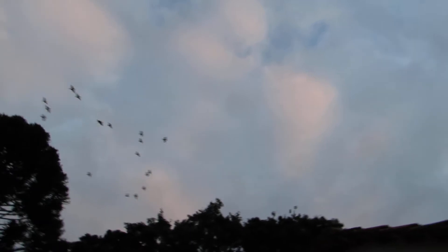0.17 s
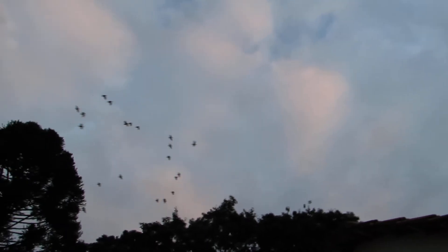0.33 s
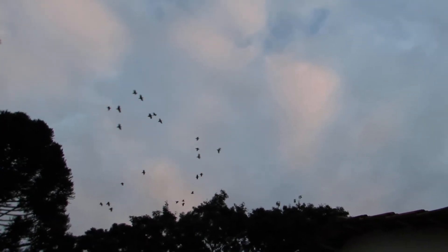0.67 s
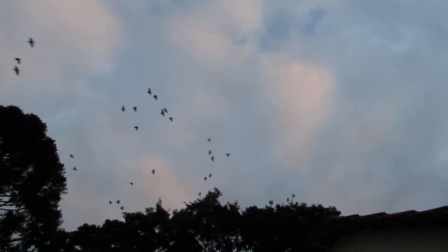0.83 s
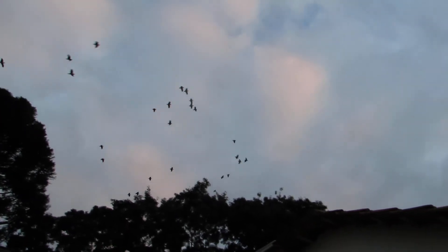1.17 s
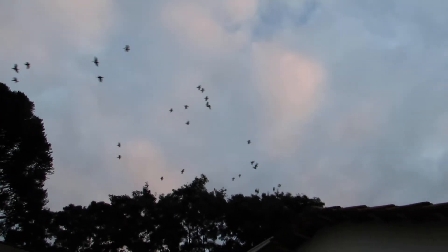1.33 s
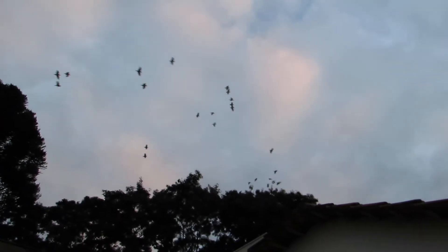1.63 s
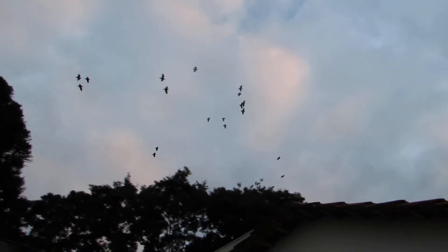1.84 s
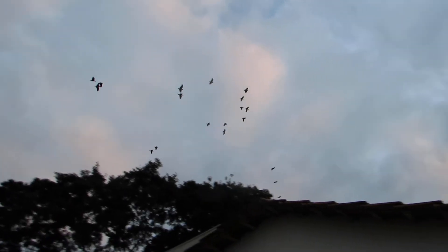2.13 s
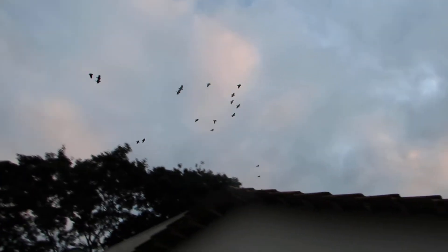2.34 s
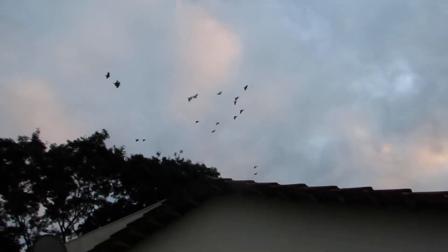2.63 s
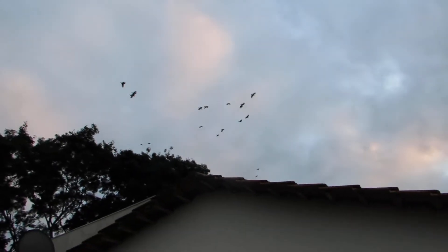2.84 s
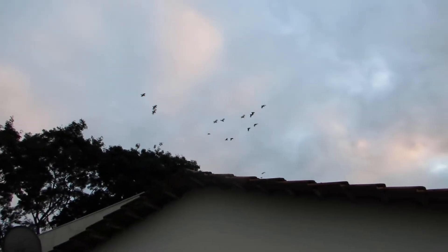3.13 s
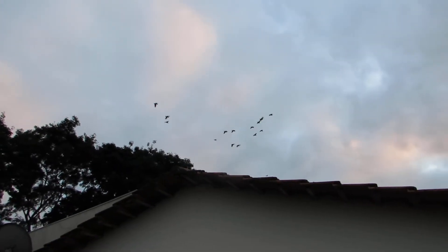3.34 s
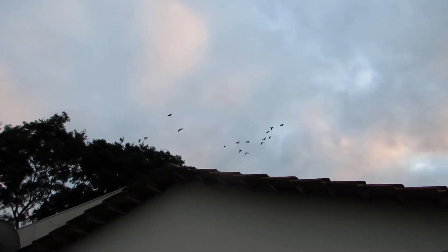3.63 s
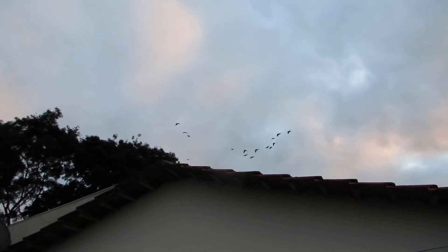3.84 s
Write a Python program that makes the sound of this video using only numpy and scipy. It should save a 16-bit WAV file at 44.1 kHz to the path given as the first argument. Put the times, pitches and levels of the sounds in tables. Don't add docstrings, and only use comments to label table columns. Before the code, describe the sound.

A flock of parrots squawks, yelps and whistles in overlapping chatter while passing overhead, heard left of centre outdoors on a handheld camera microphone, with grip thumps, a click and soft breeze rumble.

```python
import sys
import numpy as np
from scipy import signal
from scipy.fft import rfft, irfft
from scipy.io import wavfile
from scipy.ndimage import uniform_filter1d

SR = 44100
rng = np.random.default_rng(int(sys.argv[2]) if len(sys.argv) > 2 else 0)


def generate_wav(signal):
    frames = np.transpose(np.atleast_2d(signal))
    scaled = np.clip(frames, -1, 1) * 32767
    pcm = np.round(scaled).astype(np.int16)
    wavfile.write(sys.argv[1], SR, pcm)


def invert_db(x):
    u = np.asarray(x, float) / 20
    return 10 ** u


N = 175959

# start_s, length_s, level_db, pitch_hz
SQUAWKS = [(0.201, 0.3, -36.5, 743), (0.538, 0.18, -36.5, 1083), (0.701, 0.19, -39, 896),
           (0.902, 0.25, -40, 898.4), (1.079, 0.18, -38.5, 1051), (1.28, 0.26, -35.5, 811.7),
           (1.611, 0.15, -38.5, 996), (1.872, 0.22, -35.5, 889), (2.241, 0.28, -39.5, 1083),
           (2.46, .24, -35, 761), (2.683, 0.21, -38.5, 794.6), (2.817, 0.17, -40.5, 1037),
           (3.172, 0.27, -43.5, 906), (3.376, .11, -43, 1020), (3.586, 0.43, -46.5, 949),
           (3.819, .13, -42, 1414)]
# start_s, length_s, level_db, pitch_hz
RASPS = [
    (.25, .2, -46, 758),
    (1.9, .14, -46, 900),
    (3.828, 0.027, -39.5, 1180),
    (3.851, 0.092, -41.5, 1253),
]
# start_s, length_s, level_db, first_pitch_hz, last_pitch_hz
YELPS = [(0.125, 0.054, -44, 1194, 1096), (0.334, 0.081, -31, 1281, 1130), (0.538, .035, -28.5, 1284, 1184),
         (0.579, 0.059, -33.5, 1159, 1125), (0.7, 0.087, -34.5, 1136, 1092),
         (1.351, 0.066, -33, 1214, 1199), (0.738, 0.059, -40, 1117, 966), (0.854, 0.021, -33.5, 1258, 982),
         (1.90, 0.12, -30, 1099, 1089), (2.265, 0.093, -45, 1110, 1150), (2.381, 0.098, -35, 1076, 1096),
         (2.544, 0.041, -32.5, 990, 950), (2.837, 0.1164, -38, 1058, 1023), (3.01, 0.07, -38.5, 1123, 1092),
         (3.16, 0.06, -28.5, 1366, 1246), (3.22, 0.062, -40.5, 1294, 1218), (3.435, 0.04, -40.5, 1079, 945),
         (3.588, 0.045, -43.5, 1084, 1040)]
# start_s, length_s, level_db, first_pitch_hz, last_pitch_hz (before the swing)
ARCHED_YELPS = [
    (1.25, .08, -33.5, 1300, 1330),
    (3.838, .08, -32, 1330, 1290),
]
# start_s, length_s, level_db, first_pitch_hz, last_pitch_hz
FALLING_SQUAWK = (3.415, .065, -34.5, 1150, 950)
# start_s, length_s, level_db, first_pitch_hz, last_pitch_hz
WHISTLES = [(.096, 0.024, -41.5, 2005, 1800), (0.098, 0.037, -39.5, 1095, 1032),
            (0.481, 0.026, -41, 2400, 2700), (0.521, 0.028, -35, 2750, 2524), (.96, 0.058, -35, 2210, 2170),
            (.973, 0.017, -37, 2620, 2870), (1.025, 0.026, -38, 2950, 2530),
            (1.022, 0.024, -35.5, 1966, 1850), (1.074, 0.012, -32.5, 2273, 2200),
            (1.13, 0.039, -36, 2185, 2176), (1.16, 0.028, -43, 2840, 2870), (1.186, .026, -32, 2845, 1524),
            (1.203, 0.036, -36.5, 2212, 1510), (1.15, 0.023, -38, 1477, 1595),
            (1.618, 0.038, -38, 1994, 2120), (1.67, 0.034, -35, 1690, 2193),
            (1.694, 0.035, -33.5, 2160, 1953), (1.359, 0.072, -37.5, 2027, 2105),
            (1.445, 0.0302, -37, 2620, 2150), (1.55, 0.033, -39, 1700, 1620),
            (1.728, 0.045, -40, 1455, 1400), (2.264, 0.018, -35.5, 2495, 2610),
            (2.291, 0.027, -38, 2300, 2240), (2.295, 0.031, -38.5, 1672, 1724),
            (2.36, 0.022, -34.5, 1430, 1360), (2.415, .025, -34.5, 2306, 2500),
            (2.497, 0.056, -40, 2283, 2376), (2.60, 0.029, -36, 1980, 2110),
            (2.639, 0.023, -34, 1610, 1596), (2.695, 0.086, -37, 1598, 1616),
            (3.766, 0.023, -39, 2004, 1890), (3.768, 0.053, -47.5, 4200, 4620)]
# start_s, length_s, level_db, first_pitch_hz, last_pitch_hz
HONKS = [(0.578, 0.16, -38.5, 1344, 1304), (1.3, 0.24, -36.5, 1270, 1157),
         (1.435, 0.045, -35.5, 1998, 1600), (1.72, 0.2, -44.5, 920, 893), (1.931, 0.098, -38, 1330, 1472),
         (1.96, 0.39, -40, 915, 937), (2.521, 0.25, -34.5, 1588, 1590), (2.719, .13, -40, 1240, 1204),
         (3.241, .14, -41.5, 1284, 1094), (3.109, 0.072, -38.5, 1944, 1750), (3.28, 0.16, -47, 1713, 1955),
         (3.64, 0.13, -42, 1484, 1498), (3.79, 0.15, -38.5, 1102, 1216), (3.825, 0.041, -36.5, 2070, 1900)]
# start_s, length_s, level_db, first_pitch_hz, last_pitch_hz
BRASSY_CALLS = [
    (3.068, .105, -38, 716, 694),
    (.265, .13, -42, 745, 720),
]
# freq_hz, level_db
SQUAWK_TONE = [(600, -14.5), (1200, 7.5), (2200, 4), (2700, -6), (3100, -2.5), (6000, -9.5), (8000, -30.5),
               (13000, -32)]
RASP_TONE = [(2500, -12), (4500, 4.5), (6500, 0.5), (8000, -8), (12000, -20), (15000, -38)]
YELP_TONE = [(1000, -12), (2300, 5.5), (2800, -5.5), (3400, -14), (5000, -14.5), (10000, -40.5)]
WHISTLE_TONE = [(1000, 11), (2900, -6), (3300, -18), (6000, -27.5), (9000, -51)]
HONK_TONE = [(800, 0), (2000, 0), (2700, -12), (4000, -28), (8000, -45)]
BRASSY_TONE = [(700, -12), (1400, -4), (2800, 0), (3500, -8), (4250, 0), (5600, -12), (7000, -11),
               (12000, -28)]
FAR_TONE = [(600, -20.5), (1000, 8.5), (2100, -11), (2700, -7), (4500, -5), (9000, -74)]
# start_s, level_db, pitch_hz
THUMPS = [(0.455, -29, 400), (0.53, -33.5, 470), (0.738, -29, 368), (0.96, -31.5, 495), (1.003, -34, 353),
          (1.245, -28, 307), (1.501, -32, 434), (2.696, -35, 490), (.475, -31.5, 393), (.568, -32, 437),
          (1.098, -34, 315), (2.02, -36.5, 293), (2.31, -34.5, 300), (2.389, -35.5, 290), (2.48, -36, 295),
          (3.419, -36, 310), (3.581, -33.5, 262)]
# pitch_hz, level_db, t60_s
CLICK_RINGS = [
    (7200, 0, .004),
    (2300, -4, .008),
    (11500, -9, .004),
]
# start_s, level_db, pitch_hz
CREAKS = [
    (.0945, -34, 1800),
    (.253, -52, 11000),
    (3.343, -50, 9200),
    (3.172, -35, 3500),
    (4.5, -48, 9000),
]
# freq_hz, level_db (per Hz)
AIR_TONE = [(30, 7), (125, -0.5), (660, -5.5), (2100, -4), (2700, -12), (10200, -33), (11600, -29.5),
            (13000, -40)]
# freq_hz, level_db (per Hz)
RUMBLE_TONE = [(18, -32), (30, 12), (129, -3.5), (629, -16), (2130, -30), (7430, -42.5), (12200, -51),
               (15000, -55)]
# freq_hz, width_hz, depth (0-1)
HOUSING_DIPS = [(3940, 130, 1), (8460, 45, 1)]

SQUAWK_SAG = 0.07
GRIT = rng.standard_normal(2 * N)


def evened(x):
    return x / np.sqrt(np.mean(x ** 2) + 1e-20)


def read(points, hz):
    f, value = np.transpose(points)
    return np.interp(np.log(hz + 1), np.log(f + 1), value)


def add(mix, start_s, sound):
    part = mix[..., max(round(start_s * SR), 0):][..., :sound.shape[-1]]
    part += sound[..., :part.shape[-1]]


def wander(length, rate_hz, seed_s):
    at = int(seed_s * SR) % N
    smoother = [1, -2 * np.exp(-6 * rate_hz / SR), np.exp(-12 * rate_hz / SR)]
    return evened(signal.lfilter([1], smoother, GRIT[at:at + length]))


def call(start_s, length_s, level_db, first_hz, last_hz, tone, jitter, flutter, rasp, arch, edge=1):
    rise_s, fall_s = edge * 0.013, edge * 0.022
    t = np.arange(0, length_s + fall_s, 1 / SR)
    size = len(t)

    progress = np.minimum(t / length_s, 1)
    hz = first_hz + (last_hz - first_hz) * progress - arch * first_hz * (2 * progress - 1) ** 2
    turns = np.cumsum(hz * (1 + jitter * wander(size, 69.6, start_s + 1))) / SR

    k = np.arange(1, 16)[:, None]
    flicker = wander(2 * size, 148, start_s + 3)
    flicker = 1 + flutter * flicker[(k * 331) % size + np.arange(size)]
    level = flicker * invert_db(read(tone, k * hz)) * (k * hz < 15000)
    voice = (level * np.cos(2 * np.pi * (k * turns + k ** 2 / 7))).sum(0)

    breath = wander(size, 3840, start_s + 2) * (0.41 + (np.cos(2 * np.pi * turns) > 0))
    breath = signal.lfilter([1, -1.3, 0.42], [1], breath)
    bins = np.fft.rfftfreq(size, 1 / SR)
    breath = irfft(rfft(breath) * invert_db(read(tone, bins)) * (bins > 500), size)

    mix = (1 - rasp) * evened(voice) + rasp * evened(breath)
    swell_s = 0.38 * rasp * length_s
    fade_in = np.clip(t / (rise_s + swell_s), 0, 1)
    fade_out = np.clip((t[-1] - t) / (2 * fall_s + swell_s), 0, 1)
    shape = np.sin(np.pi / 2 * fade_in * fade_out) ** 2
    return start_s - rise_s / 2, invert_db(level_db) * shape * evened(mix)


def squawks(out):
    for start_s, length_s, db, hz in SQUAWKS:
        last_hz = hz * (1 - SQUAWK_SAG)
        add(out, *call(start_s, length_s, db, hz, last_hz, SQUAWK_TONE, 0.025, 0.7, 0.33, 0.06))
        chirp_count = round(8 * length_s)
        for when, pitch, stretch in rng.random((5, 3))[:chirp_count]:
            top_hz = 1000 + 450 * pitch
            chirp_s = 0.035 * (0.6 + stretch)
            add(out, *call(start_s + when * length_s, chirp_s, db - 1, top_hz, top_hz * 0.75,
                           YELP_TONE, 0.008, 0.4, 0.08, 0.1))
    for start_s, length_s, db, hz in RASPS:
        last_hz = hz * (1 - SQUAWK_SAG)
        add(out, *call(start_s, length_s, db, hz, last_hz, RASP_TONE, 0.02, 0.8, 0.5, 0.05))
    add(out, *call(*FALLING_SQUAWK, SQUAWK_TONE, 0.005, 0.5, 0.08, 0.02, 0.6))


def clear_calls(out):
    for row in YELPS:
        add(out, *call(*row, YELP_TONE, 0.008, 0.45, 0.08, 0.025))
    for row in ARCHED_YELPS:
        add(out, *call(*row, YELP_TONE, 0.006, 0.3, 0.1, 0.15, 0.6))
    for row in WHISTLES:
        add(out, *call(*row, WHISTLE_TONE, 0.007, 0.4, 0.06, 0.02, 0.4))
    for row in HONKS:
        add(out, *call(*row, HONK_TONE, 0.022, 0.6, 0.12, 0.015))
    for row in BRASSY_CALLS:
        add(out, *call(*row, BRASSY_TONE, 0.005, 0.45, 0.08, 0.012))


def far_chatter(out):
    count = 40
    for j, (when, stretch, pitch, loudness) in enumerate(rng.random((count, 4))):
        hz = 650 + 600 * pitch
        start_s = 3.8 * (j + when) / count + 0.17
        db = -42.5 + 8 * (loudness - 0.5)
        add(out, *call(start_s, 0.03 + 0.09 * stretch, db, hz, hz * (1.15 - 0.45 * when),
                       FAR_TONE, 0.012, 0.5, 0.15, 0.07))


def flock():
    out = np.zeros(N)
    squawks(out)
    clear_calls(out)
    far_chatter(out)
    return out


def echoes(birds):
    t60_s = 0.37
    t = np.arange(int(0.4 * SR)) / SR
    sparse = rng.random((2, len(t))) < 0.05
    taps = rng.standard_normal((2, len(t))) * sparse * invert_db(-60 * t / t60_s) * (t > 0.004)
    return signal.fftconvolve(birds[None], taps / np.linalg.norm(taps[0]), axes=1)[:, :N]


def ring(hz, db, t60_s, rise_s):
    t = np.arange(int(0.15 * SR)) / SR
    return invert_db(db - 60 * t / t60_s) * np.minimum(t / rise_s, 1) * np.sin(2 * np.pi * hz * t)


def handling():
    thumps, click = np.zeros((2, N))
    for start_s, db, hz in THUMPS:
        add(thumps, start_s, ring(hz, db + 15.5, 0.04, 0.0045) + ring(hz * 1.7, db + 5, 0.04, 0.0041))
    click_s, click_db = 0.7418, -19
    for delay_s, bounce_db in [(0, 7.1), (0.0008, 2.9), (0.0022, 10)]:
        strike_db = click_db + bounce_db
        add(click, click_s + delay_s, sum(ring(hz, strike_db + db, t60_s, 0.00014) for hz, db, t60_s in CLICK_RINGS))
    for start_s, db, hz in CREAKS:
        add(click, start_s, ring(hz, db + 15, 0.003, 0.0002))
    return thumps * [[1.6], [-0.7]] + click * [[1.3], [-0.5]]


def wash(tone, patchy_db, gust_db):
    frames, hz = N // 128 + 5, np.fft.rfftfreq(512, 1 / SR)
    real, imaginary, patches = rng.standard_normal((frames, 257, 3)).T
    gusts = evened(uniform_filter1d(patches[0], size=10)) * (hz[:, None] < 600)
    patches = uniform_filter1d(patches, size=6, axis=0)
    patches = evened(uniform_filter1d(patches, size=20, axis=1))
    level_db = read(tone, hz)[:, None] + patchy_db * patches + gust_db * gusts
    spectra = (real + 1j * imaginary) * invert_db(level_db)
    return evened(signal.istft(spectra, nperseg=512, noverlap=384)[1][:N])


def breeze():
    air = invert_db(-39.5) * wash(AIR_TONE, 2.0, 1.6)
    rumble = invert_db(-32) * wash(RUMBLE_TONE, 1.5, 2.8)
    band = signal.butter(1, [200, 800], "band", fs=SR)
    leak = 0.35 * signal.lfilter(*band, rumble)
    return air + leak + rumble * [[0.9], [-1.1]]


def scene():
    birds = flock()
    left_db = 5.5 + 1.5 * np.linspace(-0.5, 0.5, N)
    lean = invert_db(np.array([[0.5], [-0.5]]) * left_db)
    return lean * (birds + invert_db(-5) * echoes(birds)) + handling() + breeze()


def top_cut(x):
    return signal.sosfilt(signal.butter(12, 15330, fs=SR, output="sos"), x)


def record(dry):
    start_s, wake_s, wake_db, top_hz = 0.0935, 0.25, -4, 13800
    hz = np.fft.rfftfreq(N, 1 / SR)
    t = np.arange(N) / SR
    gain = 1 / (1 + (hz / top_hz) ** 24)
    for dip_hz, width_hz, depth in HOUSING_DIPS:
        gain = gain * (1 - np.clip(depth, 0, 1) / (1 + (2 * (hz - dip_hz) / width_hz) ** 2))
    woken = dry * invert_db(wake_db * np.exp(-(t / (start_s + wake_s)) ** 4))
    finished = irfft(rfft(woken, axis=1) * gain, N, axis=1) * (np.arange(N) > start_s * SR)
    return top_cut(finished)


dry = scene()
out = record(dry)
generate_wav(out)
```